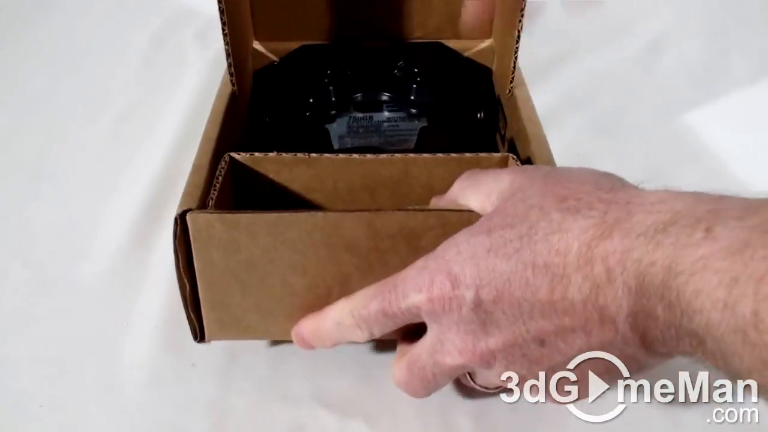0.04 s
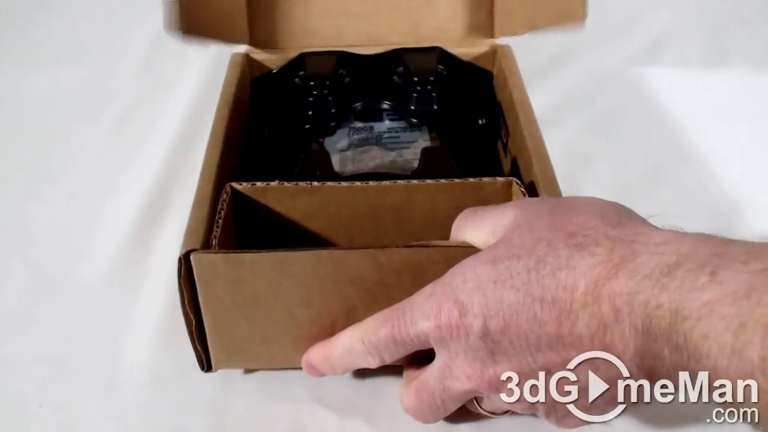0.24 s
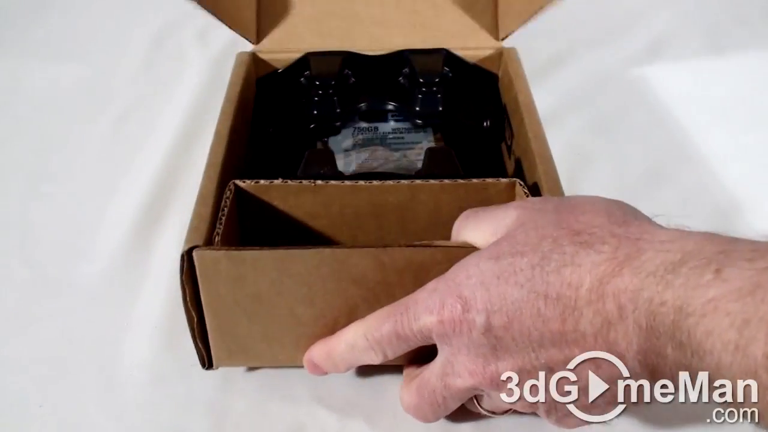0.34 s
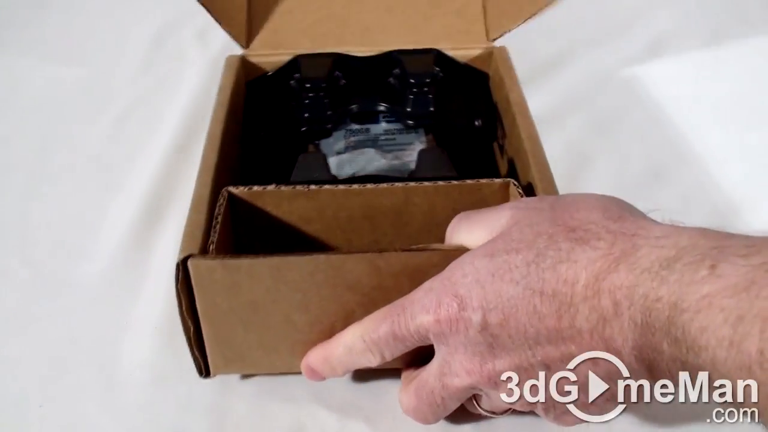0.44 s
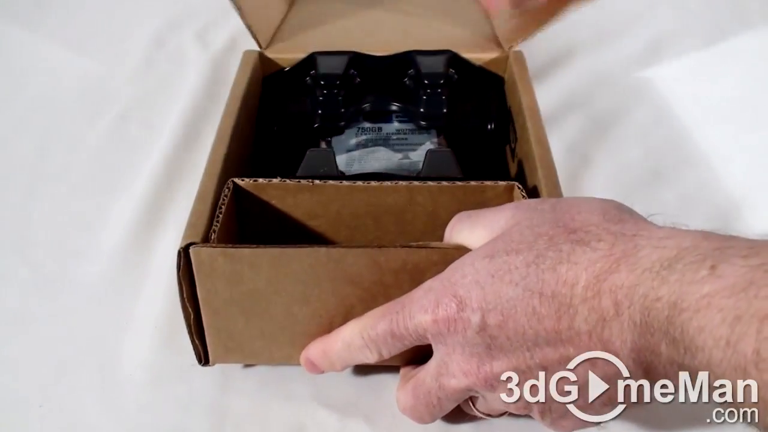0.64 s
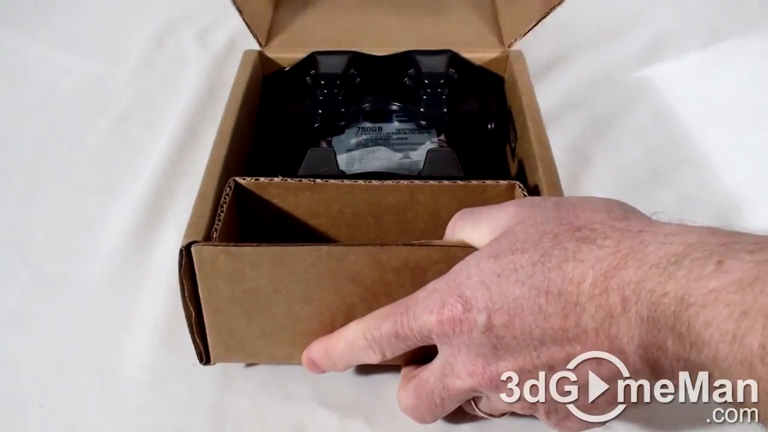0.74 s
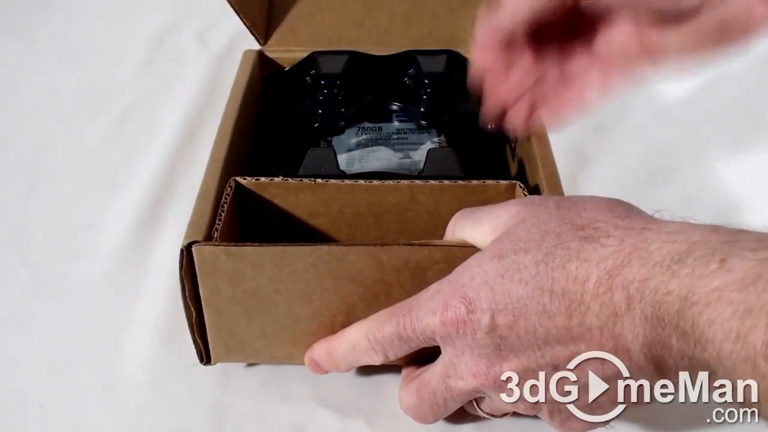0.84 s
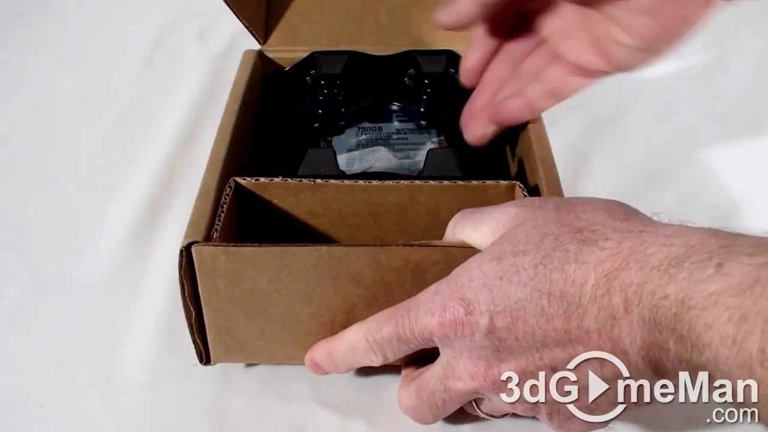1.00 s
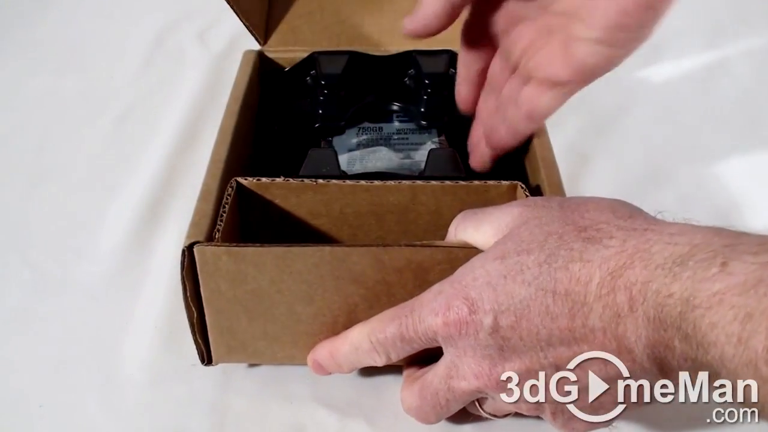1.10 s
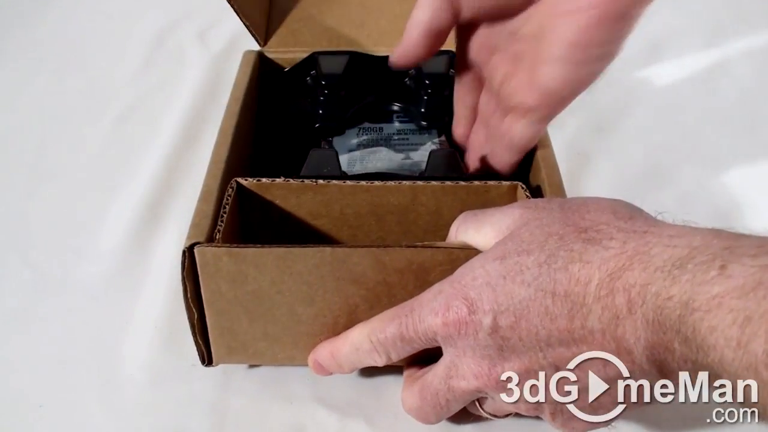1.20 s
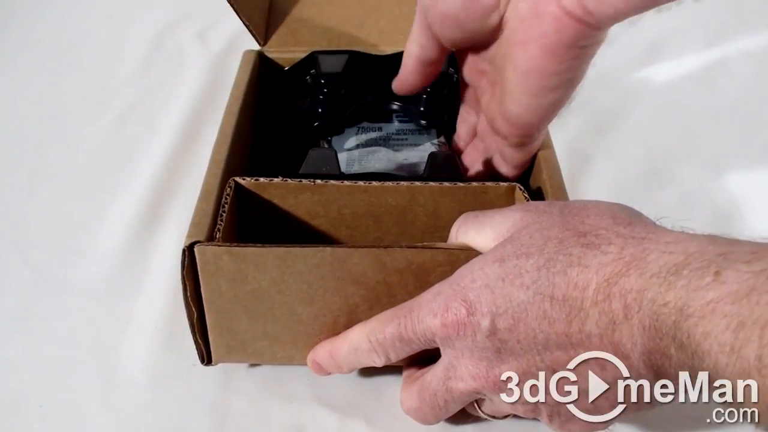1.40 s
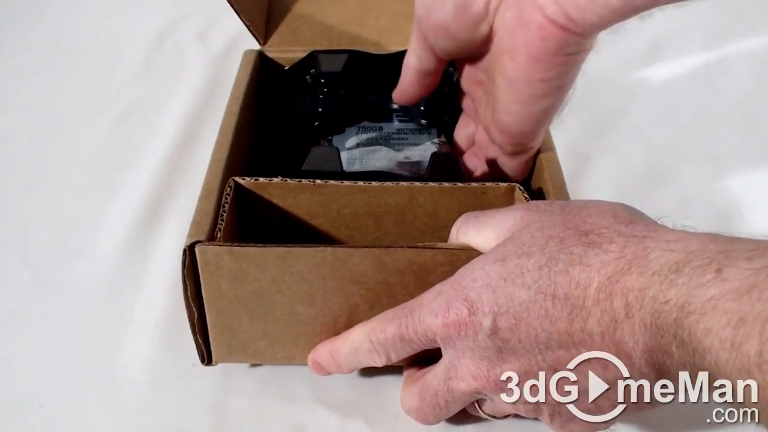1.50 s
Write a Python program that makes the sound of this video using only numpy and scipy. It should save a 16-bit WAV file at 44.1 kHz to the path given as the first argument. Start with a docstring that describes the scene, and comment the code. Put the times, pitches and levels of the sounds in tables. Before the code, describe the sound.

A cardboard box being opened, heard close in a small room with quiet air noise and faint hum. A slight rustle fades at once; at 0.2 seconds a low knock, dry cracks and a sharp scrape burst out, then lighter scraping. Around 0.63 a hollow slap shudders away by 0.9. From 1.0 a hand softly brushes cardboard, with a brief squeaky rub near 1.15, continuing faintly until the end.

```python
"""A corrugated cardboard box is opened on a table in a small room: struck modes, filtered noise and dense clicks.
A quiet room tone with mains hum lies below throughout, and at first a faint rustle dies away. The lid jerks free
with a low knock of the box (ringing modes), its flaps scrape (coloured clicks) and paper fibre cracks (noise bursts).
The lid falls back with a hollow slap and shudders out. Then a hand slides into the box: sleeve and fingers brush,
the palm rubs the wall (clicks ringing in a hollow), the wall hums and the skin squeaks once (a jittered tone)."""
import sys
import numpy as np
from scipy import signal
from scipy.fft import rfft, irfft, next_fast_len
from scipy.io import wavfile
from scipy.ndimage import uniform_filter1d

SR = 44100
rng = np.random.default_rng(int(sys.argv[2]) if len(sys.argv) > 2 else 0)


def wrap_up_sound(samples):
    """Save the sound to the file named by the first command line argument, as 16-bit audio."""
    columns = np.atleast_2d(samples).T
    # keep every value between -1 and 1, then stretch to whole-number steps
    tamed = np.clip(columns, -1, 1)
    steps = np.round(tamed * 32767).astype(np.int16)
    wavfile.write(sys.argv[1], SR, steps)


def makeup_ratio(level_db):
    """Linear amplitude ratio for a level in decibels (20 dB per factor of ten)."""
    decades = np.asarray(level_db, float) / 20
    return 10 ** decades


N = 68355   # length in samples

# Modes of the box body. Each row: frequency in Hz, relative level in dB, decay time t60 in s.
BOX_MODES = [(120, -24.5, 0.3), (182.7, -10, 0.124), (241.5, -0.5, 0.098), (282.1, -1, 0.095),
             (335, -2.5, 0.047), (558, -6, 0.044), (1164, -8, 0.051), (1377, -7.5, 0.033),
             (1920, -24, 0.042)]
# Modes of the lid panel. Each row: frequency in Hz, relative level in dB, decay time t60 in s.
LID_MODES = [(339, -12.5, 0.044), (548, -12.5, 0.046), (612.5, -1.5, 0.064), (689.4, -1, 0.078),
             (792.4, -2.5, 0.048), (861, -1.5, 0.038), (952, -7.5, 0.054), (1136, -12.5, 0.043),
             (1358, -7, 0.016), (1680, -6.5, 0.014), (2465, -10, 0.012)]


def rms_one(x):
    """Scale to unit rms."""
    return x / np.sqrt(np.mean(x ** 2) + 1e-20)


def gain_curve(rows):
    """Gain from (s, dB) rows, fading to -100 dB within 4 ms before and 20 ms after them."""
    s, db = np.transpose(rows)
    times = np.r_[s[0] - .004, s, s[-1] + .02]
    return makeup_ratio(np.interp(np.arange(N) / SR, times, np.r_[-100, db, -100]))


def swell(start_s, rise_s, fall_s):
    """Soft rise and exponential fall, top 1."""
    t = np.maximum(np.arange(N) / SR - start_s, 0)
    shape = (1 - np.exp(-t / rise_s)) ** 2 * np.exp(-t / fall_s)
    return shape / shape.max()


def drift(rate_hz):
    """Random wandering of rms 1: noise through two equal one-pole low-passes at rate_hz."""
    r = np.exp(-2 * np.pi * rate_hz / SR)
    noise = rng.standard_normal(N + SR)
    return rms_one(signal.lfilter([1], [1, -2 * r, r * r], noise)[SR:])   # the first second settles the filter


def ring(x, hz, t60):
    """A resonance: a unit click sets a decaying sine of height 1 ringing."""
    r, w = makeup_ratio(-60 / (t60 * SR)), 2 * np.pi * hz / SR
    return signal.lfilter([0, np.sin(w)], [1, -2 * r * np.cos(w), r * r], x + 1e-18)


def grains(per_s, spread_db):
    """Random clicks of uneven size and either sign, as from many tiny contacts; rms 1."""
    sizes = makeup_ratio(spread_db * np.minimum(rng.exponential(1, N), 5)) * rng.choice([-1, 1], N)
    return rms_one(sizes * (rng.random(N) < per_s / SR))


def friction_grains():
    """The fine clicks of one surface rubbing on another."""
    return grains(per_s=7000, spread_db=2.5)


def colour(x, spectrum, patchy_db):
    """Half-octave bands, each with its own level and flicker; rms 1."""
    out, edges = 0, 22 * 2 ** np.arange(0, 9.6, .5)
    hz, db = np.transpose(spectrum)
    for low, high in zip(edges, edges[1:]):
        band_db = np.interp(np.log(low * high) / 2, np.log(hz), db, left=-80)
        if band_db > -70:
            band_filter = signal.butter(2, [low, high], "band", fs=SR, output="sos")
            band = signal.sosfilt(band_filter, x * rng.choice([-1, 1], N))   # random signs part the bands
            out = out + makeup_ratio(band_db + patchy_db * drift(10.3)) * band
    return rms_one(out)


def knocks(contacts, modes, neighbour):
    """Each soft contact strikes every mode unevenly; neighbour modes start alike (near 1) or opposed (near -1)."""
    mode_spread_db = 2.5
    out, chance = np.zeros(N), rng.standard_normal((len(contacts), len(modes)))
    for (s, db, cut_hz), luck in zip(contacts, chance):
        click = np.zeros(N)
        click[int(s * SR)] = -makeup_ratio(db - 5.5)
        softened = signal.sosfilt(signal.butter(2, cut_hz, fs=SR, output="sos"), click + 1e-18)
        for k, (hz, mode_db, t60) in enumerate(modes):
            strength = neighbour ** k * makeup_ratio(mode_db + mode_spread_db * luck[k])
            out += strength * ring(softened, hz, t60)
    return out


def rattle(curve, modes, trim_db):
    """Dense small contacts keep a panel ringing; its loudness is partly evened, so that it rattles steadily."""
    even_s, even_share = 0.017, 0.58
    rung = rms_one(sum(makeup_ratio(db) * ring(grains(per_s=2500, spread_db=3), hz, t60) for hz, db, t60 in modes))
    power = uniform_filter1d(uniform_filter1d(rung ** 2, int(even_s * SR)), int(even_s * SR / 2))
    evened = rms_one(rung / (power + .05) ** (even_share / 2))
    return makeup_ratio(trim_db) * gain_curve(curve) * evened


def room_tone():
    """Steady air noise and a wavering hum of sines."""
    # Air of the room. Each row: frequency in Hz, relative density in dB per Hz.
    air = [(13, -31), (22, -4), (147, -3.5), (326, -8), (467, -19), (598, -15.5), (667, -11.5),
           (954, -14.5), (1040, -13), (1360, -14), (2950, -22.5), (12700, -33), (15800, -62)]
    # Mains hum. Each row: frequency in Hz, middle level in dB.
    hum_lines = [(60, -55), (122, -56)]
    t = np.arange(N) / SR
    hum = sum(makeup_ratio(db + 0.83 * drift(6.6)) * np.sin(2 * np.pi * hz * t) for hz, db in hum_lines)
    return makeup_ratio(-49) * colour(rng.standard_normal(N), air, patchy_db=-0.6) + hum


def flaps():
    """A rustle dying away, then the flaps scraping: friction grains coloured by the card."""
    # Rustle at the start. Each row: time in seconds, level in dB.
    fading_rustle = [(0, -49), (.02, -50), (.05, -57)]
    # Scraping flaps. Each row: time in seconds, level in dB.
    scrape = [(.217, -39.5), (.227, -27), (.245, -22.5), (.27, -25), (.284, -36.5), (.33, -34), (.386, -36),
              (.4, -33), (.42, -39.5), (.45, -37.5), (.47, -45), (.496, -42.5), (.544, -45.5),
              (.602, -37.5), (.626, -31), (.656, -40.5), (.698, -38), (.854, -68), (.89, -81)]
    # Colour of both. Each row: frequency in Hz, relative density in dB per Hz.
    card = [(410, -27), (700, 10), (747, -22), (787, -8.5), (1370, 1), (2220, -14), (3150, -5.5),
            (5570, -11), (10100, -15), (15500, -24.5)]
    gain = gain_curve(scrape) + gain_curve(fading_rustle)
    return gain * colour(friction_grains(), card, patchy_db=1.0)


def box_knocks():
    """Knocks set the modes of the box body ringing."""
    # Knocks on the body. Each row: start in seconds, relative strength in dB, contact cut-off in Hz.
    contacts = [(.2178, -4.5, 326), (.247, -19, 410), (.2615, -17, 890), (.266, -18.5, 500),
                (.5535, -27.5, 497), (.627, -15, 880)]
    return knocks(contacts, BOX_MODES, 0.97)


def box_rattle():
    """The box rattles against flaps and table, many small contacts driving its modes."""
    # Rattle of the box. Each row: time in seconds, level in dB ahead of the trim.
    curve = [(.219, -40), (.228, -17), (.24, -37), (.262, -4), (.274, -11.5), (.314, -27), (.412, -43.5),
             (.47, -36), (.54, -35.5), (.56, -28.5), (.6, -52), (.635, -36), (.66, -29), (.7, -25),
             (.8, -39.5), (.9, -56)]
    return rattle(curve, BOX_MODES, trim_db=-4)


def cracks():
    """Dry cracks of paper fibre: short bright bursts of decaying noise."""
    # Cracks. Each row: start in seconds, noise level in dB ahead of the band filter, decay time t60 in s.
    bursts = [(0.2266, -14, 0.017), (0.2422, -17, 0.04), (0.2545, -8, 0.0093), (0.5074, -34, 0.025),
              (0.531, -29, 0.011), (0.624, -16.5, 0.011), (0.8153, -34, 0.014), (0.9236, -40.5, 0.069)]
    t, out = np.arange(2048) / SR, np.zeros(N + 2048)
    for (s, db, t60), noise in zip(bursts, rng.standard_normal((len(bursts), 2048))):
        out[int(s * SR):][:2048] += makeup_ratio(db - 60 * t / t60) * noise
    bright = signal.butter(2, [1700, 9600], "band", fs=SR, output="sos")
    return signal.sosfilt(bright, out[:N])


def lid_knocks():
    """Light knocks and the hollow slap set the modes of the lid panel ringing."""
    # Knocks on the lid. Each row: start in seconds, relative strength in dB, contact cut-off in Hz.
    contacts = [(.445, -37, 1500), (.505, -28, 1500), (.558, -24, 1000), (.6275, -10.5, 2500),
                (.6345, -8.5, 1540), (.642, -10, 1180), (1.226, -39, 1200), (1.262, -38, 1530)]
    return knocks(contacts, LID_MODES, -1.06)


def lid_shudder():
    """The lid shudders after its slap and when the box is touched, small contacts driving its modes."""
    # Shudder of the lid. Each row: time in seconds, level in dB ahead of the trim.
    curve = [(.47, -51), (.52, -49), (.6, -51), (.632, -22), (.645, -15), (.66, -28), (.69, -15),
             (.72, -22.5), (.755, -24.5), (.8, -31.5), (.898, -43.5), (.996, -49), (1.022, -40),
             (1.116, -48.5), (1.212, -48), (1.24, -33), (1.298, -48.5), (1.372, -51), (1.55, -41.5)]
    return rattle(curve, LID_MODES, trim_db=0.5)


def brush():
    """Sleeve and fingers brushing the card: friction grains in flickering bands."""
    # Brushing. Each row: time in seconds, level in dB.
    strokes = [(0.9, -79), (0.926, -48.5), (0.958, -52.5), (1.024, -43), (1.094, -53.5), (1.144, -54.5),
               (1.156, -32), (1.192, -42), (1.29, -42), (1.366, -54), (1.508, -45.5), (1.55, -46)]
    # Colour of skin and sleeve. Each row: frequency in Hz, relative density in dB per Hz.
    skin = [(880, 7), (1500, -10), (2670, -13), (5040, -6), (5670, -5), (6750, -4.5), (11800, -8),
            (15500, -19)]
    return gain_curve(strokes) * colour(friction_grains(), skin, patchy_db=4.0)


def slide():
    """The palm slides down the inner wall: friction rings in the hollow between hand and wall."""
    # Sliding palm. Each row: time in seconds, level in dB ahead of a 2 dB lift.
    strokes = [(1.0, -55), (1.024, -49), (1.114, -55.5), (1.146, -49), (1.152, -42.5), (1.28, -37.5),
               (1.284, -43), (1.502, -44), (1.55, -41)]
    # Resonances of the hollow. Each row: frequency in Hz, nominal width in Hz (t60 is 1.9 / width), level in dB.
    hollow = [(480, 39, -5.5), (2020, 480, 1.5), (2307, 115, 1.5), (2660, 290, -5.5), (3290, 310, -3),
              (3640, 280, -2.5), (6020, 990, -6)]
    rub, rung = friction_grains(), 0
    for k, (hz, width_hz, db) in enumerate(hollow):
        resonance = rms_one(ring(rub, hz, 1.9 / width_hz))
        rung = rung + (-1) ** k * makeup_ratio(db + 1.14 * drift(17)) * resonance
    return makeup_ratio(2.0) * gain_curve(strokes) * rms_one(rung)


def push():
    """The wall of the box hums under the hand's first push: friction noise in one low wall mode."""
    hum = ring(rng.standard_normal(N), hz=470, t60=3.8 / 31)
    return makeup_ratio(-34.5) * swell(start_s=1.125, rise_s=0.031, fall_s=0.022) * rms_one(hum)


def squeak():
    """Skin sticks and slips on the card for a moment: a harmonic tone of jittering pitch."""
    # Harmonics of the squeak. Each entry: level in dB, for multiples 1 to 5 in turn.
    orders_db = [-44.5, -35.5, -37, -26.5, -54]
    pitch_hz = 1940 * (1 + 0.029 * drift(360))
    phase = 2 * np.pi * np.cumsum(pitch_hz) / SR
    tone = sum(makeup_ratio(db) * np.sin((k + 1) * phase) for k, db in enumerate(orders_db))
    return swell(start_s=1.151, rise_s=0.014, fall_s=0.0069) * tone


def room(x):
    """Small-room echo: eight feedback delays, duller on every round."""
    t60_s, wall_cut_hz = 0.32, 5200
    size = next_fast_len(N + SR)
    w = 2 * np.pi * np.arange(size // 2 + 1) / size
    dull = 1 / (1 + 1j * w * SR / (2 * np.pi * wall_cut_hz))
    response = 0
    for k, delay_s in enumerate(np.geomspace(.011, .037, num=8)):
        loop = makeup_ratio(-60 * delay_s / t60_s) * dull * np.exp(-1j * w * delay_s * SR)
        response = response + (-1) ** k * loop / (1 - loop)   # all rounds of one delay
    return irfft(rfft(x, size) * response, size)[:N]


def scene():
    """All sources and the room tone; knocks, cracks and squeak also sound in the room."""
    hits = box_knocks() + cracks() + lid_knocks() + squeak()
    panels = box_rattle() + lid_shudder()
    rubs = flaps() + brush() + slide() + push()
    return (hits + makeup_ratio(-16) * room(hits) + panels + rubs + room_tone())[None]


def top_cut(x):
    """Nothing passes above the cut-off."""
    return signal.sosfilt(signal.butter(12, 16150, fs=SR, output="sos"), x)


def record(dry):
    """The microphone rolls off the bass and rounds peaks, then the top is cut."""
    thin = signal.sosfilt(signal.butter(2, 31, "high", fs=SR, output="sos"), dry)
    mic_top = 0.7
    rounded = mic_top * np.tanh(thin / mic_top)
    finished = signal.sosfilt(signal.cheby2(12, 70, 16100, fs=SR, output="sos"), rounded)
    return top_cut(finished)


dry = scene()
out = record(dry)
wrap_up_sound(out)
```